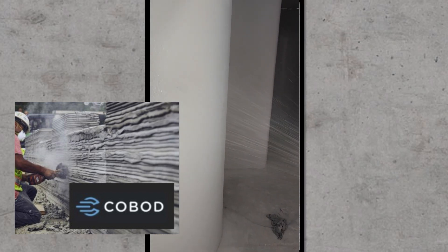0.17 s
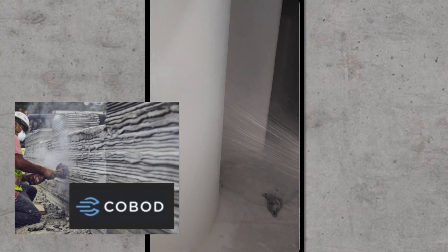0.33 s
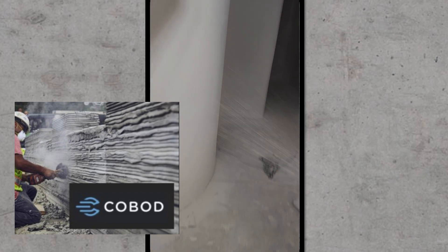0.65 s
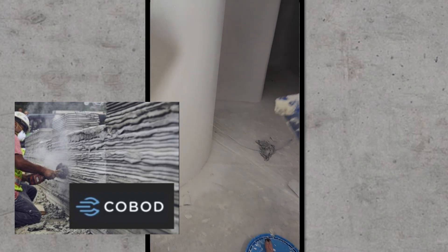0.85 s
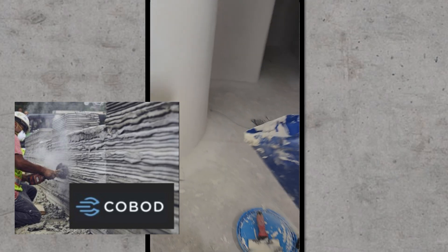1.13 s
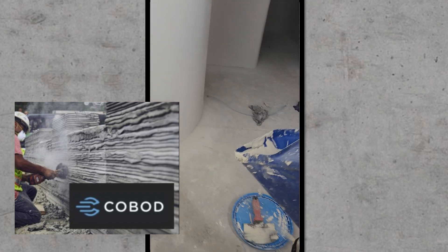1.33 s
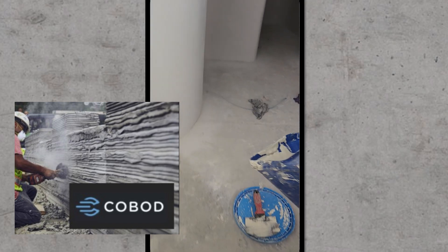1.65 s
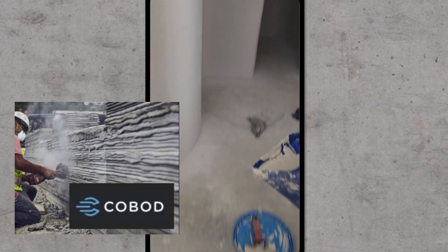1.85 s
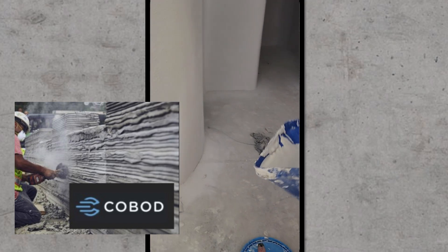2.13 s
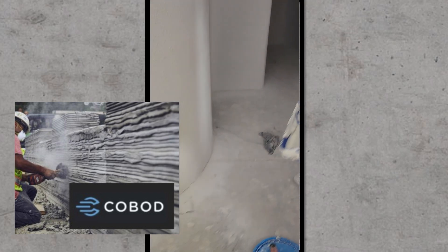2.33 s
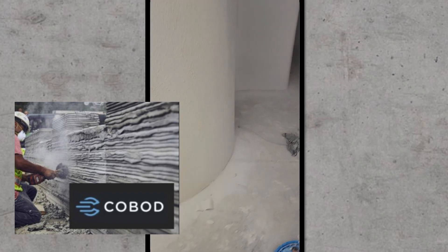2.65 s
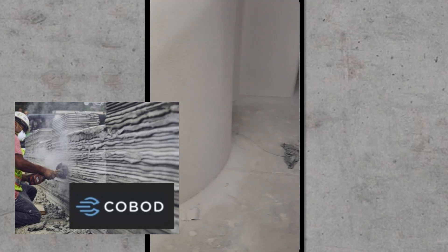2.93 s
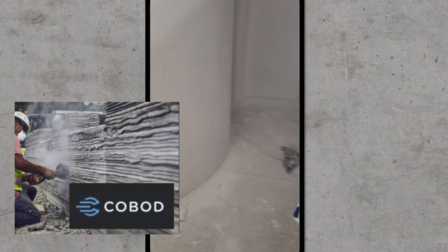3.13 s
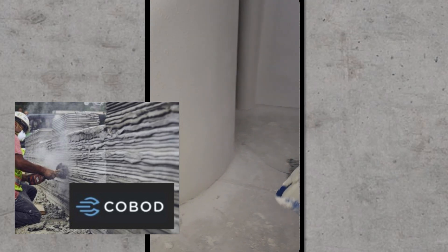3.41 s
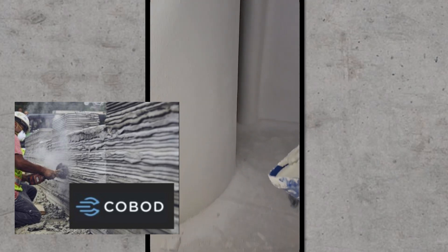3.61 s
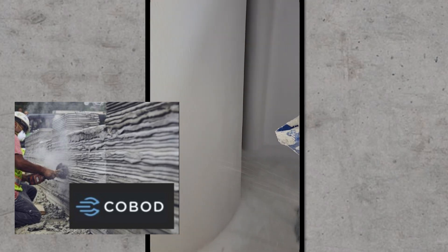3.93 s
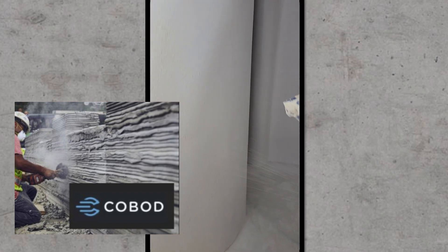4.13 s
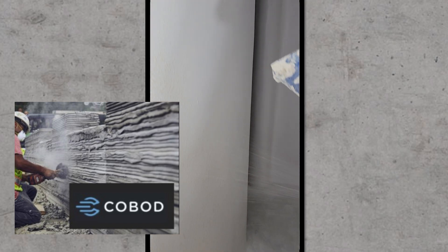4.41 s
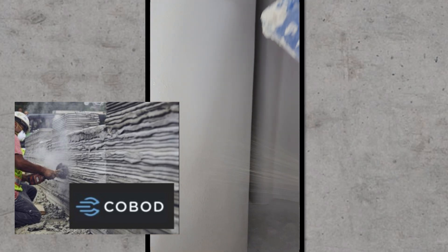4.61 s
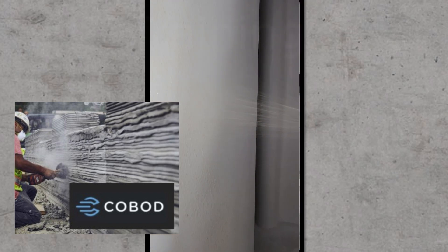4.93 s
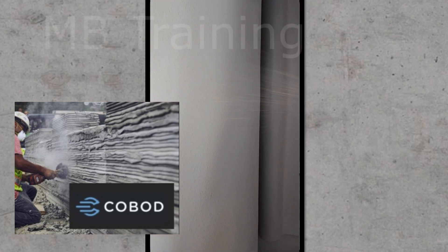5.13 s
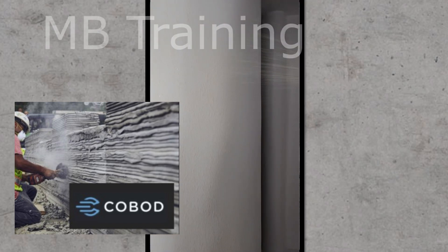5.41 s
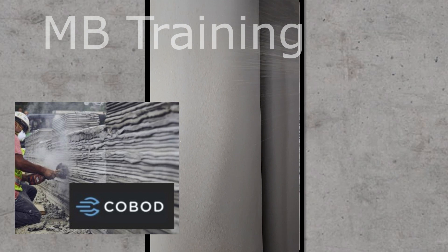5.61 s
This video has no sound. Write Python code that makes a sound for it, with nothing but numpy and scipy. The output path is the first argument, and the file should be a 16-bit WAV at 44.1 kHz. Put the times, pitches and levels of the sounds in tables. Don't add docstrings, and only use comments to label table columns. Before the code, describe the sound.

Air hisses faintly over a distant compressor hum, then a trigger pull bursts into a sputtering spray roar, stops briefly, and starts again.

```python
import sys
import numpy as np
from scipy import signal
from scipy.io import wavfile
from scipy.ndimage import map_coordinates

SR = 44100
rng = np.random.default_rng(int(sys.argv[2]) if len(sys.argv) > 2 else 0)


def materialize(psi):
    bounded = np.clip(np.atleast_2d(psi).T, -1, 1)
    quanta = np.round(bounded * 32767).astype(np.int16)
    wavfile.write(sys.argv[1], SR, quanta)


def rack_gain(trim_db):
    fader = np.asarray(trim_db, float)
    return 10 ** (fader / 20)


N = 253971
CONTROL_STEP = 32

# freq_hz, density_db (per Hz)
BLEED_SPECTRUM = [(500, -20), (1200, -32), (3000, -10), (6000, -7), (8000, -21), (10500, 2), (13000, 6),
                  (16000, 3.5)]
# freq_hz, density_db (per Hz)
JET_SPECTRUM = [(600, -14), (1200, -22), (2500, -27), (4500, -14), (6500, 3), (8000, -10), (11000, -28),
                (16000, -9)]
# freq_hz, density_db (per Hz)
ROAR_SPECTRUM = [(30, -12.5), (250, -10), (700, -6), (1500, -1), (2300, -2.5), (3500, 1.5), (5000, 1),
                 (8000, -15.5), (16000, -8)]
# freq_hz, width_hz, level_db
TIP_MODES = [(6055, 460, -0.5), (6560, 400, 1), (6980, 600, -4.5)]
# freq_hz, width_hz, level_db
BARREL_MODES = [(1061, 51, 4.5), (1160, 96, -4.5), (1330, 225, -2), (1863, 140, -3)]
# freq_hz, width_hz, level_db
HOPPER_MODES = [(346.8, 27, 0.5), (383.7, 53, -4), (427, 61, -9), (519.3, 41, -4.5), (586, 60, -11)]
# freq_hz, density_db (per Hz)
RUMBLE_SPECTRUM = [(15, -43), (25, -10.5), (140, -1.5), (189, -10.5), (248, -5.5), (355, -19), (583, -12.5),
                   (900, -22), (1170, -50), (1980, -120)]
RUMBLE_DB = -38.5
HUM_HZ = [146.8, 240, 293.6, 440.4, 587.2, 611]
HUM_DB = [-44.5, -48, -51.5, -54, -52.5, -61]

# freq_hz, direct_share (0-1)
DIRECT_SHARE = [(60, .05), (200, 0.12), (700, 0.57), (1500, 0.4), (4000, 0.66), (8000, 0.53), (15000, 0.64)]
# freq_hz, left_minus_right_db
SIDE_LEAN = [(60, 3), (700, 3), (2400, 5), (5000, 5.5), (8000, -1), (11000, 3.5), (15000, 0)]
# left_ms, right_ms, level_db, sway_ms
ECHOES = [(0, 0, 0, .02), (1.3, 1.5, -6, .07), (2.9, 2.6, -6, .1), (4.7, 5.2, -6, .12), (8.9, 8.1, -7, .15)]
# freq_hz, width_hz, left_db, right_db
PORT_MODES = [(6890, 1160, 8.5, 0), (7520, 800, -1.3, 6.5), (8060, 940, -3.5, 0.3), (2400, 500, 0.7, -2.5),
              (9640, 1360, -1, -1.5), (10800, 800, 0, 3), (13600, 1500, -1.5, -1.7), (16100, 870, -4, 4.5)]
# time_s, left_lag_ms, hopper_left_minus_right_db
SWING = [
    (0, -.2, 7),
    (1, -0.075, 4),
    (2, 0.068, 3),
    (3, .15, .8),
    (4, 0.16, -1.5),
    (5, 0.037, 1.5),
    (5.76, 0, -2),
]
# time_s, turn_to_ports (0-1), jet_tilt_db, closeness_db, nozzle_left_minus_right_db
POSE = [(0, .1, -2, 2.5, 0), (.3, .1, 1, 0.5, 4), (.55, 0.24, -4, -0.5, 3), (.9, 0.27, 1, 0.2, 0.5),
        (1.25, 0.06, -1, 0.5, -2), (1.6, 0, 0.5, 0.5, -1.5), (1.86, .3, 0, 0.5, -2.5),
        (1.98, 0.6, -5, 1.5, -1), (2.2, 0.88, -4, 1.5, 3), (2.45, 0.97, 2.5, 0, -1), (2.9, 1, 2.5, 0, -2.5),
        (3.42, 0.98, 0.5, .4, -1), (3.8, 0.98, -2, 0, -3.5), (4.4, 0.91, 0.5, 0, -4),
        (4.78, .8, 0.5, 0.5, 2), (5.15, .6, -1, -1.5, -0.5), (5.42, 0.56, 0.4, -1, -3),
        (5.76, 0.93, 2.5, 0, 0)]

# air_s, plaster_s, release_s, wet_spit (share carried by the first air, 0-1)
TRIGGER = [
    (.33, .483, 4.438, .95),
    (5.28, 5.457, 6, .15),
]
# time_s, peak_db
SLUGS = [(0.589, -12), (0.896, -13), (0.96, -8), (1.227, -12), (1.314, -12), (1.869, -9), (1.967, -8),
         (2.216, -9), (2.381, -7), (2.444, -9), (2.68, -7), (2.768, -9), (2.908, -10), (3.041, -8),
         (3.1, -9), (3.185, -9), (3.301, -11), (3.359, -10), (3.512, -11), (3.766, -9), (3.857, -11),
         (4.08, -13)]
# time_s, surge_db
SURGES = [(.52, 0.5), (.62, -2.5), (.74, -1), (.82, 1), (1.29, 1), (1.36, -5.5), (1.43, 1.5), (1.95, 3),
          (2.15, 3.5), (2.47, 6.5), (2.85, 1), (3.13, -4), (3.22, 2.5), (3.5, -3.5), (3.62, 1),
          (3.85, -0.5), (4.1, -1), (4.39, 1), (5.47, -9), (5.52, -5.5), (5.56, -3), (5.61, 5.5),
          (5.7, -2.5), (5.76, 3)]
PARTS = {"bleed": (-24.5, -22.5, -18, 2, -0.08, 0.23), "jet": (-32, -19.5, -18, 0.6, 1.2, 0.05),
         "roar": (-40, -32, -18.5, -1, 0.03, 0.32), "barrel": (-50, -58, -33, 13, 0.18, 0.03),
         "boom": (-59, -52, -24.5, -0.4, -0.36, 1.07)}

VALVE_OPEN_S, VALVE_SHUT_S = 0.015, 0.015
SLACK_S, SLACK_SHARE = 0.1, 0.3
REBOUND_AFTER_S, REBOUND_S, REBOUND_SHARE = 0.047, 0.017, 0.57
CREEP_S, CREEP_SHARE = 0.09, 0.26
PLASTER_RISE_S, PLASTER_STOP_S = 0.014, 0.055
PLASTER_LEAD_S = 0.029
TAIL_S, TAIL_DB = 0.09, 11.5
FILL_S = 0.006
SURGE_S = 0.059


def rms_one(x):
    return x / np.sqrt(np.mean(x ** 2) + 1e-20)


def in_time(rows):
    s, *columns = np.transpose(rows)
    return [np.interp(np.arange(N) / SR, s, column) for column in columns]


def at_hz(points, hz):
    table_hz, value = np.array(points).T
    return np.interp(np.log(hz), np.log(table_hz), value)


def drift(rate_hz):
    r = np.exp(-40 * np.pi * rate_hz / SR)
    noise = rng.standard_normal(N // 20 + 2002)
    slow = signal.lfilter([1], [1, -2 * r, r * r], noise)[2000:]
    return np.interp(np.arange(N) / 20, np.arange(len(slow)), rms_one(slow))


def resonate(x, hz, width_hz):
    r = np.exp(-np.pi * width_hz / SR)
    top = np.array([1, 0, -1]) * (1 - r * r) / 2
    return signal.lfilter(top, [1, -2 * r * np.cos(2 * np.pi * hz / SR), r * r], x)


def mix(noise, share):
    share = np.clip(share, 0, 1)
    return np.sqrt(share) * noise[0], np.sqrt(1 - share) * noise[1:]


def pan(db):
    return rack_gain(np.array([db / 2, -db / 2]))


def bands(low_hz, high_hz, count):
    edges = np.geomspace(low_hz, high_hz, count + 1)
    white = rng.standard_normal((2, 3, N))
    for k, (low, high) in enumerate(zip(edges, edges[1:])):
        band = signal.butter(2, [low, high], "band", fs=SR, output="sos")
        yield np.sqrt(low * high), signal.sosfilt(band, white[k % 2])


def ramp(start_s, length_s):
    return np.clip((np.arange(0, N, CONTROL_STEP) / SR - start_s) / max(length_s, 0.002), 0, 1)


def bump(at_s, half_s):
    return ramp(at_s - half_s, half_s) - ramp(at_s, half_s)


def air_valve(air_s, off_s):
    slack = SLACK_SHARE * ramp(air_s - SLACK_S, SLACK_S)
    opened = (1 - SLACK_SHARE) * ramp(air_s, VALVE_OPEN_S)
    shut = ramp(off_s + 0.008, VALVE_SHUT_S)
    return slack + opened - shut + REBOUND_SHARE * bump(off_s + REBOUND_AFTER_S, REBOUND_S)


def level(part):
    shut_db, air_db, spray_db, turn_db, per_tilt, per_surge = PARTS[part]
    wet = part in ("roar", "barrel", "boom")
    fill_s = FILL_S * (part in ("barrel", "boom"))
    air = plaster = tail = 0
    for air_s, wet_s, off_s, spit in TRIGGER:
        arrive = ramp(wet_s + fill_s, PLASTER_RISE_S)
        stop = ramp(off_s - PLASTER_LEAD_S, PLASTER_STOP_S)
        creep = CREEP_SHARE * ramp(wet_s - CREEP_S, CREEP_S)
        air = air + air_valve(air_s, off_s) * (spit + (1 - spit) * arrive if wet else 1)
        plaster = plaster + creep + (1 - CREEP_SHARE) * arrive - stop
        tail = tail + stop * np.exp(-ramp(off_s, 0.83) / TAIL_S)
    turn, tilt_db, close_db = [curve[::CONTROL_STEP] for curve in in_time(POSE)[:3]]
    surge_db = sum(db * bump(s, SURGE_S) for s, db in SURGES)
    flow = plaster if wet else np.minimum(air, plaster + tail)
    spray_lift_db = spray_db - air_db + turn_db * turn + per_surge * surge_db
    db = shut_db + (air_db - shut_db) * air + spray_lift_db * flow
    db = db + per_tilt * tilt_db + close_db + wet * TAIL_DB * tail * (1 - air)
    return np.interp(np.arange(N), np.arange(0, N, CONTROL_STEP), db)


def nozzle(sputter):
    bleed = (rack_gain(level("bleed") + 6.0) * pan(in_time(POSE)[3])) ** 2
    jet = rack_gain(level("jet") + 6.0 + 1.0 * sputter) ** 2
    roar = rack_gain(level("roar") + 9.5 + 1.1 * sputter) ** 2
    direct, diffuse = np.zeros((2, 2, N))
    for hz, noise in bands(28.2, 17570, count=18):
        power = bleed * rack_gain(at_hz(BLEED_SPECTRUM, hz)) ** 2
        power = power + jet * rack_gain(at_hz(JET_SPECTRUM, hz)) ** 2
        power = power + roar * rack_gain(at_hz(ROAR_SPECTRUM, hz)) ** 2
        turbulence = rack_gain(0.41 * drift(18.0))
        gain = np.sqrt(power) * turbulence * pan(at_hz(SIDE_LEAN, hz))[:, None]
        near, far = mix(noise, at_hz(DIRECT_SHARE, hz))
        direct += gain * near
        diffuse += gain * far
    return direct, diffuse


def cavity(modes, share, grit_db):
    flow = rng.standard_normal((3, N)) * rack_gain(grit_db * drift(220.0))
    rung = 0
    for k, (hz, width_hz, db) in enumerate(modes):
        wide_hz = 1.32 * width_hz
        once = resonate(flow, hz, wide_hz)
        rung = rung + rack_gain(db) * resonate(once, hz, wide_hz) * (-1) ** k
    return mix(rms_one(rung), share)


def whistle(sputter):
    gain = rack_gain(level("jet") - 6.5 + 0.5 * sputter) * pan(np.array([5.0]))
    return [gain * part for part in cavity(TIP_MODES, share=0.68, grit_db=3.0)]


def paths(direct, lag_ms):
    out, now = np.zeros((2, N)), np.arange(N)
    for left_ms, right_ms, db, sway_ms in ECHOES:
        sway = sway_ms * drift(0.637)
        left_delay_ms = left_ms + lag_ms + sway
        right_delay_ms = right_ms + sway + 0.31 * sway_ms * drift(0.74)
        for side, ms in enumerate([left_delay_ms, right_delay_ms]):
            when = now - ms * SR / 1000
            out[side] += rack_gain(db) * map_coordinates(direct[side], [when], order=3, mode="nearest")
    return out / np.sqrt(sum(rack_gain(db) ** 2 for _, _, db, _ in ECHOES))


def compressor():
    t = np.arange(N) / SR
    tones = 0
    for hz, db in zip(HUM_HZ, HUM_DB):
        gain = rack_gain(db + 2.0 + 0.56 * drift(1.9))
        tones = tones + gain * np.sin(2 * np.pi * (hz * t + rng.random()) + 0.13 * drift(4.4))
    rumble = sum(rack_gain(at_hz(RUMBLE_SPECTRUM, hz)) * noise for hz, noise in bands(29.7, 980, count=7))
    near, far = mix(rumble, 0.88)
    return tones + rack_gain(RUMBLE_DB - 3.0) * rms_one(near + far)


def cough(decay_s):
    kicks = np.zeros(N)
    for s, db in SLUGS:
        kicks[min(round(s * SR), N - 1)] = np.clip(db + 22.0, 0, 9)
    return signal.lfilter([1], [1, -np.exp(-1 / (decay_s * SR))], kicks)


def barrel(sputter):
    near, far = cavity(BARREL_MODES, share=0.88, grit_db=3.5)
    both = np.array([np.roll(near, 9), near]) + far
    turn = in_time(POSE)[0]
    return rack_gain(level("barrel") - 2.0 + 0.8 * sputter) * pan(0.3 + 3.0 * turn) * both


def hopper(sputter):
    near, far = cavity(HOPPER_MODES, share=1.0, grit_db=0.7)
    both = np.array([near, np.roll(near, 14)]) + far
    return rack_gain(level("boom") - 0.5 + 0.46 * sputter) * pan(in_time(SWING)[1]) * both


def scene():
    sputter = 0.4 * drift(7.4) + 1.2 * drift(61.0)
    lumps = cough(decay_s=0.0076)
    jet_near, jet_far = nozzle(sputter + 0.13 * lumps)
    tip_near, tip_far = whistle(sputter)
    left_lag_ms = in_time(SWING)[0]
    spray = paths(jet_near + tip_near, left_lag_ms) + jet_far + tip_far
    return spray + compressor() + barrel(sputter + lumps) + hopper(sputter + 0.44 * lumps)


def roll_off(x):
    return signal.sosfilt(signal.butter(12, 15910, fs=SR, output="sos"), x)


def record(dry):
    x = dry
    for hz, width_hz, left_db, right_db in PORT_MODES:
        lift = rack_gain(np.array([[left_db], [right_db]])) - 1
        x = x + lift * resonate(x, hz, width_hz)
    overloaded = 1.5 * np.tanh(x / 1.502)
    top_cut = signal.ellip(12, 0.3, 70, 15860, fs=SR, output="sos")
    return roll_off(signal.sosfilt(top_cut, overloaded))


dry = scene()
out = record(dry)
materialize(out)
```